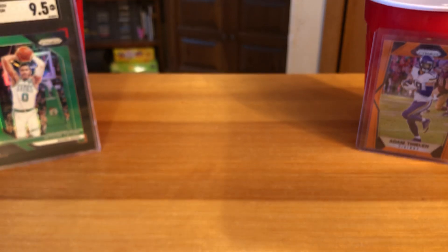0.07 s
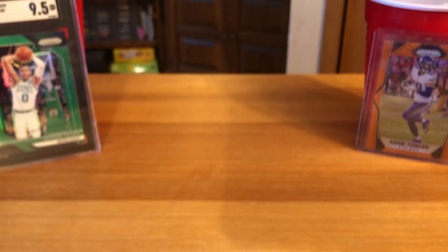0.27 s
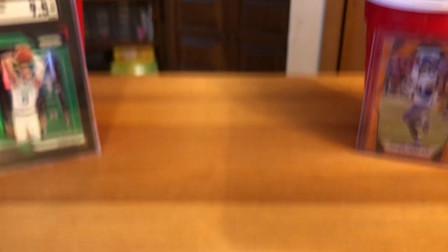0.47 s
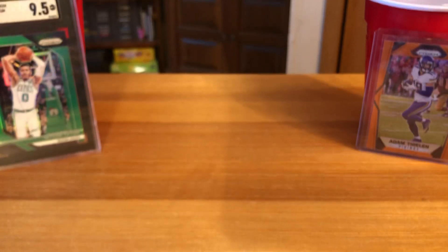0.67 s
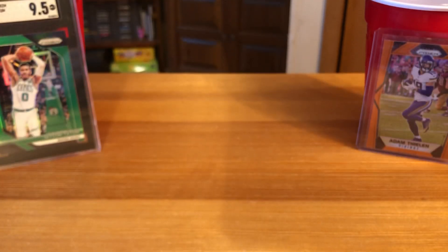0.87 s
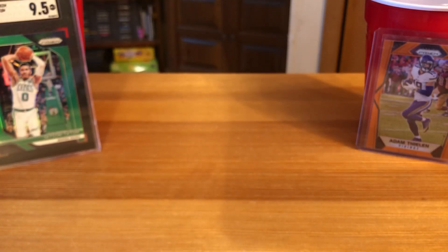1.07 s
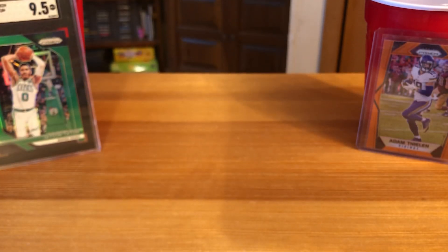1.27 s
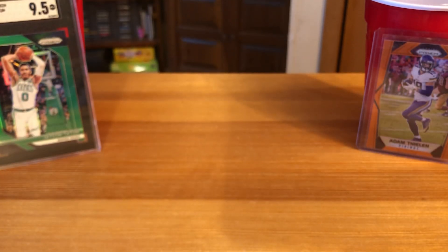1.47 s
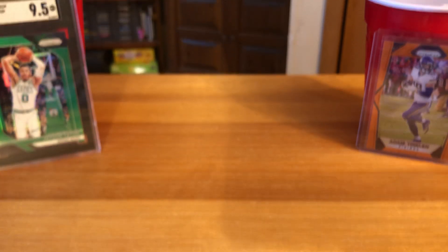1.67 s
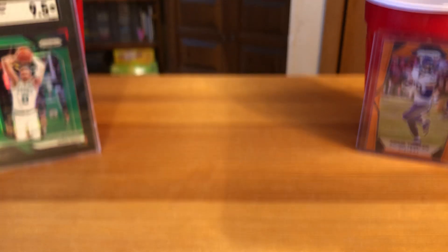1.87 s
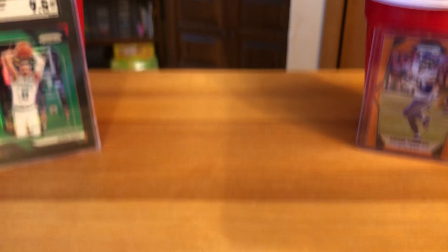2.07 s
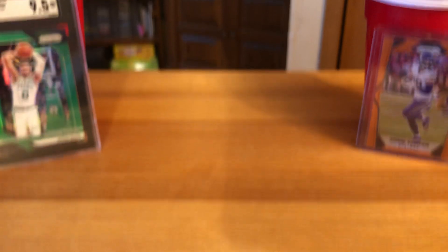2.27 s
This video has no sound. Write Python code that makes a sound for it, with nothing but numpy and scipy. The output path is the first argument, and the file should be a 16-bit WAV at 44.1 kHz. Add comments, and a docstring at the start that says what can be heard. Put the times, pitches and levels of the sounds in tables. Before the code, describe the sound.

Hard plastic holder tapped sharply on a wooden tabletop in two quick runs, quiet room

```python
"""Quiet room: a hard plastic holder is tapped on a wooden table in two quick runs, close by.
Each tap is two to four contacts (corner, then edge): clicks over damped modes of holder and tabletop.
Decaying noise gives the room's answer; shaped noise and wavering sines give hiss and hum throughout.
Between the runs a faint ticking whir sounds: pulses and noise through resonances.
Fingers brush the plastic, before and during the second run: gritty noise swishes."""
import sys
import numpy as np
from scipy import signal
from scipy.fft import rfft, irfft, next_fast_len
from scipy.io import wavfile
from scipy.ndimage import map_coordinates

SR = 44100
rng = np.random.default_rng(int(sys.argv[2]) if len(sys.argv) > 2 else 0)


def output_pcm(signal):
    """Save a mono or channel-first signal as 16-bit PCM at the path in sys.argv[1].

    Samples are clipped to [-1, 1] before scaling.
    """
    pcm = np.clip(np.atleast_2d(signal).T, -1, 1) * 32767
    wavfile.write(sys.argv[1], SR, np.round(pcm).astype(np.int16))


N = 101826


def amp(db):
    """Decibels to amplitude factor."""
    return 10 ** (np.asarray(db) / 20)


def unit(x):
    """Scale to rms 1."""
    return x / np.sqrt(np.mean(x ** 2) + 1e-20)


def along(points, hz):
    """Interpolate (frequency [Hz], value) points on a log-frequency axis."""
    point_hz, value = np.transpose(points)
    return np.interp(np.log(hz + 1), np.log(point_hz + 1), value)


def filtered(x, response):
    """Multiply the spectrum of x by response(hz), zero-padded."""
    size = next_fast_len(len(x) + 8192)
    hz = np.fft.rfftfreq(size, 1 / SR)
    return irfft(rfft(x, size) * response(hz), size)[:len(x)]


def hiss(spectrum):
    """Gaussian noise coloured by a spectrum, rms 1."""
    return unit(filtered(rng.standard_normal(N), lambda hz: amp(along(spectrum, hz))))


def wobble(knots_per_s):
    """Smooth random curve: a spline through Gaussian knots."""
    knots = rng.standard_normal(int(N * knots_per_s / SR) + 4)
    return map_coordinates(knots, [np.arange(N) * knots_per_s / SR])


MODE_SCATTER_DB = 1.5
RISE_CYCLES, SOFT_SLOPE = 0.15, 3.6


def ring(modes, t, corner_hz, pitch_scatter):
    """Damped modes, neighbours in opposite phase; a soft contact excites the high ones less."""
    hz, db, t60_s = np.transpose(modes)[:, :, None]
    level_draw, pitch_draw = rng.standard_normal((2, len(modes), 1))
    size = amp(db + MODE_SCATTER_DB * level_draw - 60 * t / t60_s)
    size = size / np.sqrt(1 + (hz / corner_hz) ** SOFT_SLOPE)
    size = size * (-1.) ** np.arange(len(modes))[:, None]
    size = size * (1 - np.exp(-t * hz / RISE_CYCLES))
    return (size * np.sin(2 * np.pi * hz * (1 + pitch_scatter * pitch_draw) * t)).sum(0)


# Click spectrum: (frequency [Hz], level [dB])
CLICK_SPECTRUM = [(1500, -12), (3000, 12.5), (4500, 16.5), (6500, 9.5), (8200, 7), (10000, 8), (12500, 8.5),
                  (14500, -1.5), (17000, -11.5)]
# Modes of the holder, its lowest bending, the tabletop, and narrow table modes that outlast the knock:
# each (frequency [Hz], level [dB], t60 [s])
HOLDER_MODES = [(1270, -5.5, 0.0086), (1544, -3, 0.032), (1771, -4.5, .015), (1989, -4, 0.013),
                (2488, -3, 0.013), (2820, -10.5, 0.0091), (3594, -4.5, .012), (4830, -13, 0.0032),
                (5520, -13.5, .008)]
FLEX_MODES = [(900, -6, 0.035), (1001, 0, 0.018), (1163, -3.5, 0.015)]
TABLETOP_MODES = [(125, -22.5, 0.038), (190, -23.5, .05), (265.6, -24, 0.063), (421, -11.5, 0.026),
                  (527, -10.5, .035), (603, -8.5, .03), (700, -14.5, .03), (789.6, -11.5, 0.028)]
LINGER_MODES = [(85.4, -27, .2), (414.6, -30.5, 0.26), (540, -27, .2), (628, -30.5, 0.11),
                (611.5, -25, 0.29), (780, -29.5, 0.36), (950, -26.5, 0.18), (984, -26.5, .22),
                (1300, -27, 0.39), (1404, -29, 0.16), (1526, -26, 0.15), (1476, -27.5, .28),
                (1650, -34, 0.28), (1900, -30, .25), (2097, -32.5, .25)]
KNOCK_SCATTER, LINGER_SCATTER = .012, .002  # relative pitch spread
BOUNCE_S, BOUNCE_DB, BOUNCE_HZ = .0014, -22, 7080
CHATTER_DB, CHATTER_T60_S = -10, 0.018
CLICK_REACH = 11.7  # click corner / mode corner
PRE_SAMPLES = 32  # room ahead of the click for its filter's pre-ringing


def contact(click_db, knock_db, corner_hz, table_db, flex_db):
    """Click with dull quick echo and chatter, over holder and tabletop modes; lingering modes apart."""
    t = np.arange(SR // 2) / SR

    def late(x):
        return np.pad(x, (PRE_SAMPLES, 0))[:len(t)]

    def click_response(hz):
        bounce = amp(BOUNCE_DB) * np.exp(-2j * np.pi * hz * BOUNCE_S) / (1 + (hz / BOUNCE_HZ) ** 2)
        softness = 1 + (hz / corner_hz / CLICK_REACH) ** 2
        return 1j * amp(along(CLICK_SPECTRUM, hz)) * (1 + bounce) / softness

    chatter = amp(-60 * t / CHATTER_T60_S) * rng.standard_normal(len(t))
    strike = late((t == 0) + amp(CHATTER_DB) * chatter / np.linalg.norm(chatter))
    click = filtered(strike, click_response)
    knock = ring(HOLDER_MODES, t, corner_hz, KNOCK_SCATTER)
    knock = knock + amp(flex_db) * ring(FLEX_MODES, t, corner_hz, KNOCK_SCATTER)
    knock = knock + amp(table_db) * ring(TABLETOP_MODES, t, corner_hz, KNOCK_SCATTER)
    linger = ring(LINGER_MODES, t, corner_hz, LINGER_SCATTER)
    return amp(click_db) * click + amp(knock_db) * late(knock), amp(knock_db) * late(linger)


# Reverberation time of the late tail: (frequency [Hz], t60 [s])
LATE_T60 = [(60, 0.5), (200, 0.1), (500, 0.42), (1200, 0.45), (3000, 0.56), (6000, 0.44), (12000, 0.39)]
# Colour of the room's answer: (frequency [Hz], level [dB])
ROOM_COLOUR = [(60, 0), (200, 3.5), (500, 5.5), (1000, -1), (2000, 1), (3500, -0.5), (5800, -11),
               (7200, -5.5), (11000, -13.5), (15700, -9), (16100, -54.5)]
EARLY_DB, EARLY_T60_S, EARLY_RISE_S = -5.5, 0.12, 0.0049
LATE_DB, LATE_RISE_S = -7, 0.011


def room(x):
    """Near surfaces answer quickly, then each frequency dies at its own speed."""
    hz, frame_s, bins = signal.stft(rng.standard_normal(SR // 2), SR, nperseg=128)
    decay = amp(-60 * frame_s / along(LATE_T60, hz)[:, None])
    late = signal.istft(bins * decay, SR, nperseg=128)[1]
    t = np.arange(len(late)) / SR
    early = np.clip(t / EARLY_RISE_S, 0, 1) ** 2 * amp(-60 * t / EARLY_T60_S)
    early = early * rng.standard_normal(len(t))
    early = amp(EARLY_DB) * early / np.linalg.norm(early)
    late = amp(LATE_DB) * np.clip(t / LATE_RISE_S, 0, 1) ** 2 * late / np.linalg.norm(late)
    tail = filtered(early + late, lambda hz: amp(along(ROOM_COLOUR, hz)))
    return signal.fftconvolve(x, tail)


# Contacts of holder on table: (time [s], click level [dB], knock level [dB], softness corner [Hz],
# tabletop weight [dB], flex weight [dB])
TAP_CONTACTS = [(-.0012, -17.5, -12.5, 2600, 5, 0), (.0023, -5, -14, 3240, -14, 4.5),
                (0.1611, -70, -30.5, 700, -2, -9), (0.169, -22, -13, 3200, -1.5, 5.5),
                (0.1723, -4.5, -13.5, 2940, 3, -7), (0.3452, -15, -8.5, 2780, -0.5, -1),
                (0.3462, -7.5, -15.5, 3000, 5.5, 3), (0.5037, -5.5, -12.5, 2930, 3, -1),
                (.5046, -11, -10.5, 3070, -9, -3), (0.5069, -28, -12, 2477, -1, 6),
                (1.57, -19, -14.5, 1667, 5.5, 2.5), (1.5728, -72, -34.5, 1500, 6.5, 15.5),
                (1.734, -70, -38.5, 700, 6, -17), (1.7412, -34.5, -17, 2000, 6.5, 0.5),
                (1.7435, -16.5, -19, 2120, 9.5, 0.5), (1.915, -77, -29, 800, 1.5, 15),
                (1.9174, -38, -20, 2560, 1, 6), (1.9199, -6, -11.5, 2445, 2, 3),
                (1.9213, -18.5, -23, 2010, -28.5, -14), (2.0772, -24.5, -17, 2620, 0, -11),
                (2.0796, -4, -9, 2780, 4.5, -1), (2.252, -70, -30.5, 795, 21, -8),
                (2.2552, -6.5, -14.5, 3040, -15, 5.5), (2.2558, -12.5, -8, 2980, -4.5, -3)]
LEAD_SAMPLES = 2048  # the first contact starts before zero


def taps():
    """Sum of all contacts, direct and through the room; lingering modes direct only."""
    out = np.zeros(N + LEAD_SAMPLES + 2 * SR)
    for time_s, *how in TAP_CONTACTS:
        dry, linger = contact(*how)
        start = round(time_s * SR) + LEAD_SAMPLES - PRE_SAMPLES
        wet = room(dry)
        out[start:start + len(dry)] += dry + linger
        out[start:start + len(wet)] += wet
    return out[LEAD_SAMPLES:LEAD_SAMPLES + N]


# Room tone spectrum: (frequency [Hz], relative density [dB per Hz])
AIR_SPECTRUM = [(20, -55), (50, -16), (103, -14.5), (160, -8.5), (200, -7.5), (238, 0.5), (265, -7.5),
                (295, -3), (345, -7), (400, -15.5), (540, -16.5), (690, -15), (850, -28), (1300, -29),
                (2700, -36), (4500, -39), (7000, -43.5), (15600, -46.5), (16100, -72)]
# Hum lines: (frequency [Hz], mean rms level [dB])
HUM_LINES = [(59.5, -61.5), (119, -71), (242, -64), (286, -70)]
AIR_DB = -55
WAVER_DB, WAVER_KNOTS_PER_S = 2.5, 3.6


def air():
    """Room tone: coloured noise for machinery murmur and hiss, sines of wavering level for hum."""
    t = np.arange(N) / SR
    hum = 0
    for hz, db in HUM_LINES:
        level = amp(db + WAVER_DB * wobble(WAVER_KNOTS_PER_S))
        hum = hum + np.sqrt(2) * np.sin(2 * np.pi * hz * t) * level
    return amp(AIR_DB + 0.496 * wobble(2.2)) * hiss(AIR_SPECTRUM) + hum


# Tick pulses ahead of the resonances: (time [s], level [dB])
TICK_PULSES = [(.961, -23), (.985, -18), (1.031, -20)]
# Resonances, summed then squared: (frequency [Hz], width [Hz], level before squaring [dB])
WHIR_RESONANCES = [(1500, 500, -9), (3600, 550, -5.5), (5050, 550, -7.5)]
# Noise level: (time [s], level [dB])
WHIR_NOISE_LEVEL = [(0.899, -104.5), (.94, -77), (1.049, -78), (1.19, -82.5), (1.241, -85)]


def whir():
    """Faint small mechanism: ticks and thin flickering noise through the same resonances."""
    def case(hz):
        total = 0
        for centre_hz, width_hz, db in WHIR_RESONANCES:
            band = 1j * hz * width_hz
            total = total + amp(db) * band / (centre_hz * centre_hz - hz * hz + band)
        return total ** 2

    time_s, level_db = np.transpose(WHIR_NOISE_LEVEL)
    ticks = np.zeros(N)
    for tick_s, tick_db in TICK_PULSES:
        ticks[round(tick_s * SR)] = amp(tick_db)
    level = amp(np.interp(np.arange(N) / SR, time_s, level_db) + 3 * wobble(46))
    noise = unit(filtered(rng.standard_normal(N), case))
    return filtered(ticks, case) + level * noise


# Finger strokes: (peak time [s], level [dB], rise over the last 20 dB [s], fall t60 [s], treble corner [Hz])
BRUSH_STROKES = [(1.297, -47.5, 0.013, 0.041, 16000), (1.314, -56, 0.012, 0.2, 14000),
                 (1.34, -63, 0.012, 0.11, 8000), (1.385, -52.5, 0.011, 0.14, 5000),
                 (1.659, -53, 0.014, 0.18, 16000), (1.754, -42, 0.0052, .03, 12000)]
# Stroke noise spectrum: (frequency [Hz], relative density [dB per Hz])
BRUSH_SPECTRUM = [(500, -1), (1300, -1.5), (2500, -5.5), (5000, -8.5), (8000, -6), (12000, -14),
                  (15800, -12), (16100, -60)]
GRIT_DB, GRIT_KNOTS_PER_S = 1, 610
BRUSH_ROOM_DB = 1.5


def brushes():
    """Fingers on plastic: noise roughened in level, some strokes duller, with the room's answer."""
    t, dry = np.arange(N) / SR, 0
    for peak_s, db, rise_s, t60_s, corner_hz in BRUSH_STROKES:
        grit = unit(amp(GRIT_DB * wobble(GRIT_KNOTS_PER_S)) * hiss(BRUSH_SPECTRUM))
        grit = filtered(grit, lambda hz: 1 / (1 + (hz / corner_hz) ** 2))
        swell_db = np.where(t < peak_s, -20 * (peak_s - t) / rise_s, -60 * (t - peak_s) / t60_s)
        dry = dry + grit * amp(db + swell_db)
    return dry + amp(BRUSH_ROOM_DB) * room(dry)[:N]


def scene():
    """Mix all layers into one channel."""
    return (taps() + air() + whir() + brushes())[None]


LOW_HZ, TOP_HZ = 60, 17100
CEILING, KNEE = .72, 4  # full scale = 1; higher knee bends harder


def record(dry):
    """Microphone: deep bass lost, loud peaks rounded off, band limit on top."""
    x = filtered(dry[0], lambda hz: (1j * hz / (LOW_HZ + 1j * hz)) ** 2)
    x = x / (1 + np.abs(x / CEILING) ** KNEE) ** (1 / KNEE)
    return filtered(x, lambda hz: hz < TOP_HZ)[None]


dry = scene()
out = record(dry)
output_pcm(out)
```